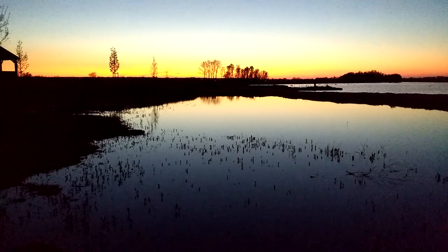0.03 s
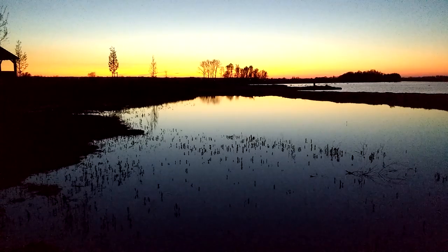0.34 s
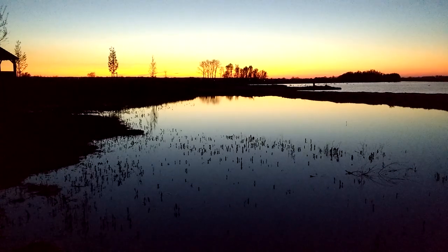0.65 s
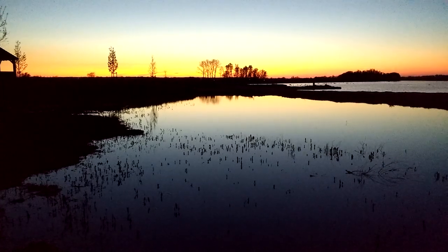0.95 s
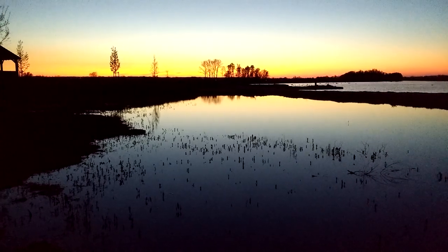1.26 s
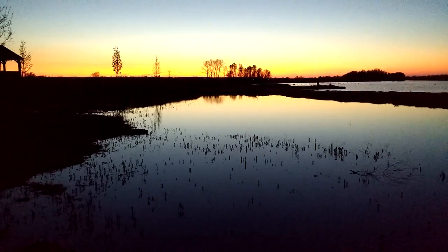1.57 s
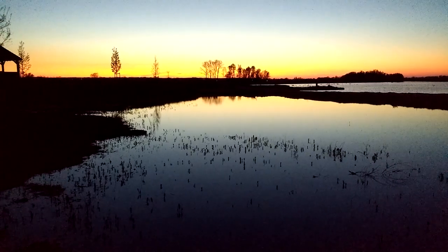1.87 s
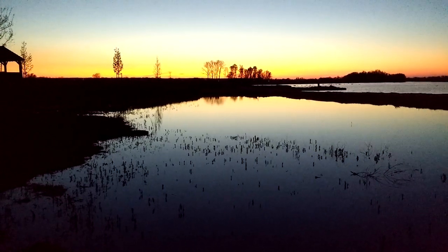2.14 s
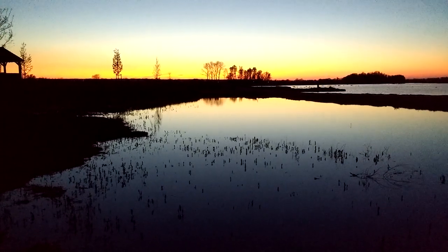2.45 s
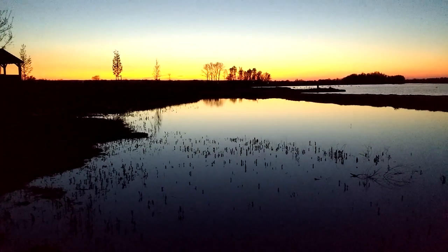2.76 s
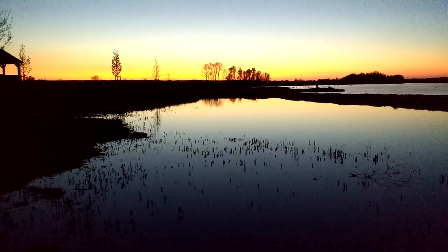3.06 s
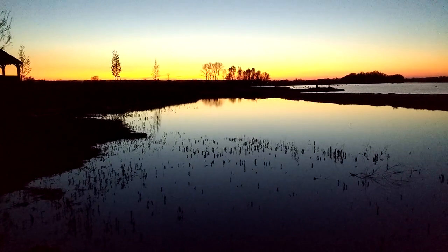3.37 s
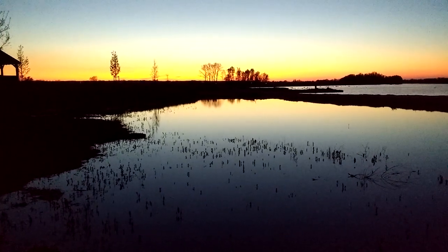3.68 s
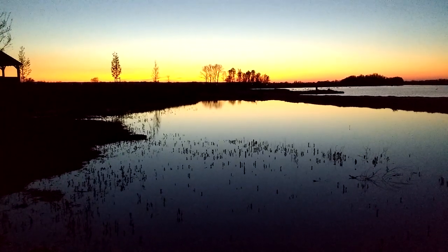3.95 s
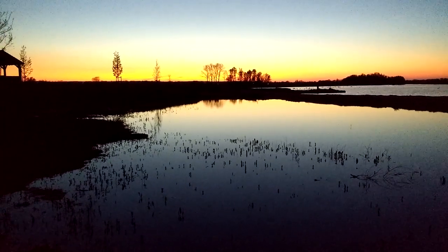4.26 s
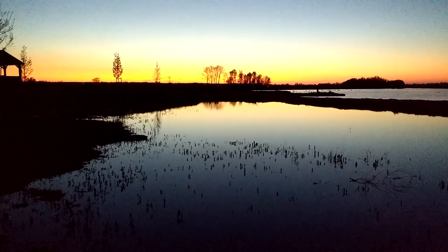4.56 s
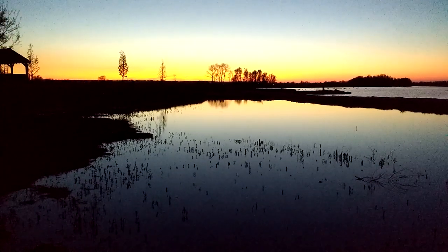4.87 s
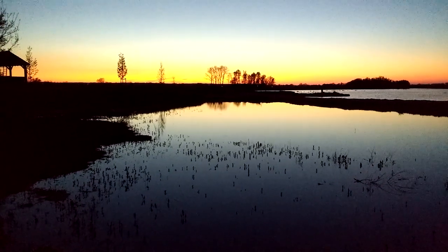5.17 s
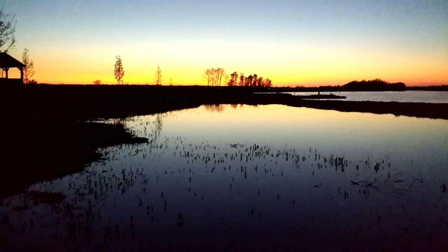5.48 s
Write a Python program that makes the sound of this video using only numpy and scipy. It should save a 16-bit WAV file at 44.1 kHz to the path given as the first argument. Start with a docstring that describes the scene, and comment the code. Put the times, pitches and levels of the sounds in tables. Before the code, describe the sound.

A dense chorus of toads trills at a pond while a distant goose honks five times over faint rumble and hiss.

```python
"""Dusk at a still pond fades in: a low rumble, microphone hiss and a chorus of toads all round.
Within the first second four close toads start up: a shrill, a deep, a mellow, then a bright one.
Each call is a trill, a run of short pulses that rasp briefly and ring the toad's vocal sac.
Two faint ticks come near 1.6 s, then a distant goose honks five times from 1.8 to 3.5 s.
The banks echo faintly, and the toads keep calling to the end."""
import sys
import numpy as np
from scipy import signal
from scipy.fft import rfft, irfft
from scipy.io import wavfile

SR = 44100
rng = np.random.default_rng(int(sys.argv[2]) if len(sys.argv) > 2 else 0)


def log_audio(samples):
    """Write samples as a 16-bit WAV file to the path given in sys.argv[1]."""
    # one column per channel
    frames = np.atleast_2d(samples).T
    # limit to full scale, then quantise
    limited = np.clip(frames, -1, 1)
    pcm = np.round(limited * 32767).astype(np.int16)
    wavfile.write(sys.argv[1], SR, pcm)


N = 247842
T = np.arange(N) / SR
FREQS = np.fft.rfftfreq(N, 1 / SR)
SIDES = np.array([[1], [-1]])  # adds to the left, takes from the right

# toad pulses that stand out of the trills: t/s, relative level/dB, f/Hz, left minus right/dB
LOUD_PULSES = [(0.2529, -18, 1626, -14), (0.6208, -18, 1547, -14), (0.6471, -16, 1600, -13),
               (0.6868, -13.5, 1575, -14), (0.7948, -17, 1570, -13), (1.263, -14, 1465, -9),
               (1.3291, -14.5, 1454, -11), (1.432, -20.5, 1515, -4), (1.7597, -12.5, 1545, -11),
               (1.803, -17, 1681, -11), (1.8352, -14.5, 1570, -13.5), (1.878, -14.5, 1530, -11.5),
               (1.924, -18.5, 1576, -20), (2.0476, -15.5, 1487, -11), (2.0669, -14.5, 1615, -10),
               (2.573, -12.5, 1562, -3.5), (2.6219, -18, 1546, -6.5), (2.7552, -14, 1590, -7.5),
               (2.8623, -16.0, 1605, -10), (2.9794, -16, 1624, -13.5), (3.006, -15.5, 1590, -13),
               (3.0364, -12, 1545, -11), (3.1015, -15.0, 1570, -9), (3.129, -16.5, 1490, -14),
               (3.579, -14.5, 1620, -11.5), (3.6978, -17, 1597, -16), (3.7138, -11.5, 1653, -4),
               (3.7387, -16.5, 1520, -9.5), (3.8081, -23.5, 1629, -10.5), (3.9985, -13, 1495, -9.5),
               (4.135, -12, 1546, -9.0), (4.1551, -12.5, 1560, -13), (4.3502, -17, 1560, -10),
               (4.5196, -12.5, 1645, -0.5), (4.5533, -13.5, 1586, -10.5), (4.8406, -14, 1586, -10.5),
               (4.8789, -14, 1526, -7), (4.9082, -15, 1460, -6), (4.9332, -14, 1575, -12),
               (4.9688, -14.5, 1490, -11.5), (5.016, -15, 1562, -9), (5.1603, -14.5, 1644, -6.0),
               (5.2367, -20.5, 1556, -6)]


def undb(db):
    """Turn decibels into a number to multiply by."""
    return 10 ** (np.asarray(db) / 20)


def level(x, db):
    """Scale a sound to an average (rms) level."""
    return x * undb(db) / np.sqrt(np.mean(x ** 2))


def curve(rows):
    """Join (time, value) rows by straight lines."""
    return np.interp(T, *np.transpose(rows))


def shape(points, hz):
    """Read between (frequency, value) points, giving every octave equal room."""
    f, value = np.transpose(points)
    return np.interp(np.log(hz + 1), np.log(f), value)


def noise(db):
    """Noise with a given gain at each frequency."""
    return irfft(rfft(rng.standard_normal(N)) * undb(db), N)


def wobble(per_s):
    """A random wobble, about 1 in size, that heads for a new value per_s times a second."""
    targets = rng.standard_normal(N // 8)
    return 1.3 * np.interp(T * per_s, np.arange(len(targets)), targets)


def rumble():
    """A low, distant rumble whose level wavers a little."""
    tone = [(20, -27), (50, -12), (80, -4.5), (97, 1), (114, -5), (145, -1), (175, -6), (199, 3),
            (225, -6.5), (310, -12), (600, -11), (900, -15), (1800, -11.5), (2400, -46)]  # the part both sides share: f/Hz, relative level/dB
    width = [(25, 10), (60, 1.5), (120, -3.5), (250, -3.5), (500, -6.5), (1000, -9)]  # the unshared part against the shared: f/Hz, level/dB
    shared_db = shape(tone, FREQS) - 60 * (FREQS > 2600)
    sound = noise(shared_db) + SIDES * noise(shared_db + shape(width, FREQS))
    return level(sound * undb(.5 * wobble(per_s=5.4)), -42.5)


def hiss():
    """Microphone hiss flickers; what both sides share dips every 2490 Hz, less so in the treble."""
    tone = [(500, -10.5), (2450, 2), (3100, 3.5), (4000, 5.5), (4800, 2), (6300, -2), (8500, -3),
            (11000, -8.5), (15000, -14)]  # colour of the hiss: f/Hz, relative level/dB
    width = [(1000, -3), (2200, 9), (2650, 9.5), (3200, -3), (4200, -8), (6000, -3.5), (12000, 1)]  # the unshared part against that colour: f/Hz, level/dB
    balance = [(4000, -1), (8000, -2), (12000, -4.5)]  # lean of the hiss: f/Hz, left minus right/dB
    tone_db = shape(tone, FREQS)
    dips_db = 10 * np.log10(.0053 + (FREQS / 13000) ** 4 + np.sin(np.pi * FREQS / 2490) ** 2)
    sound = noise(tone_db + dips_db) + SIDES * noise(tone_db + shape(width, FREQS))
    sound *= undb(1.2 * wobble(per_s=450))
    return level(irfft(rfft(sound) * undb(SIDES * shape(balance, FREQS) / 2), N), -52)


def ticks():
    """Each faint tick is a bright crack that dies within a millisecond or two."""
    cracks = [(1.5774, -48, -3), (1.6238, -45.5, -4)]  # ticks near the microphone: t/s, level/dB, left minus right/dB
    bright_noise = level(noise(shape([(2000, -30), (5000, 0), (9000, -3), (15000, -10)], FREQS)), 0)
    out = 0
    for start, db, pan_db in cracks:
        decay = (T >= start) * np.exp(-np.abs(T - start) / .0008)
        out = out + undb(db + SIDES * pan_db / 2) * bright_noise * decay
    return out


def bank_echo(x, fade_s, echo_db):
    """Reeds and banks scatter a faint echo, different at each side, that falls 60 dB in fade_s."""
    t = T[:SR // 2]
    tail = rng.standard_normal((2, len(t))) * undb(-60 * t / fade_s) * (1 - np.exp(-t / .01))
    tail *= undb(echo_db) / np.sqrt(np.sum(tail ** 2, axis=1, keepdims=True))
    return signal.fftconvolve(x.mean(axis=0)[None], tail, axes=1)[:, :N]


def goose():
    """Each honk rises and falls in pitch, hoarse at its edges; the throat boosts some overtones."""
    honks = [(1.82, .1, 309, -51, -2), (2.228, .11, 316, -43.5, 0), (2.648, .11, 320.5, -42.5, 0),
             (3.082, .12, 324.4, -42.5, 0), (3.505, .09, 343.5, -42.5, -6.5)]  # middle t/s, length/s, top f/Hz, level/dB, treble/dB
    throat = [(320, -4.5), (640, -10), (1000, 1), (1600, -4), (2200, -15), (2550, -5), (2880, 1.5),
              (3250, -6), (3520, 7), (3750, -5), (3950, -6), (4170, 0), (4600, -11), (6000, -30)]  # how the throat rings: f/Hz, gain/dB
    out, waver = np.zeros(N), wobble(per_s=400)
    harmonic = np.arange(1, 18)[:, None]
    for middle, length, top_hz, db, treble_db in honks:
        span = np.abs(T - middle) < length
        place = (T[span] - middle) / length  # runs from -1 to 1
        hoarse = (.005 + .025 * np.abs(place)) * waver[span]
        hz = top_hz * (1 - .26 * place ** 2 + hoarse)
        treble = np.clip(harmonic * hz / 1500 - 1, 0, 1)
        gain = undb(shape(throat, harmonic * hz) + treble_db * treble)
        tone = (gain * np.sin(harmonic * 2 * np.pi * np.cumsum(hz) / SR)).sum(axis=0)
        out[span] += level(tone, db) * np.exp(-np.abs(2 * place) ** 3)
    return out


def trill(start, end, rates, hz, climb, jitter_s, scatter_db):
    """Times, pitches and gains of one call's pulses: the pace drifts, the pitch climbs as the sac fills."""
    t = np.arange(0, max(end - start, .05), .001)
    count = np.cumsum(np.interp(t, [0, t[-1] / 2, t[-1]], rates)) * t[1]
    age = np.interp(np.arange(int(count[-1] - count[0]) + 1), count - count[0], t)
    late, size, tune = rng.standard_normal((256, 3))[:len(age)].T
    call_hz = hz * (1 + .004 * rng.standard_normal())  # no two calls have quite the same pitch
    pitch = call_hz * (1 - climb * np.exp(-age / .23) + .0085 * tune)
    return start + age + jitter_s * late, pitch, undb(scatter_db * size)


def toad_pulses(calls, hz, climb, jitter_s, scatter_db, give_way=.55):
    """Times, pitches and gains for all of one toad's calls; a pulse close to a loud pulse is softened."""
    loud_times = np.array(LOUD_PULSES)[:, 0]
    rows = []
    for start, end, *rates, db, swell_db in calls:
        times, pitch, gain = trill(start, end, rates, hz, climb, jitter_s, scatter_db)
        gain = gain * undb(db + swell_db * np.linspace(-.5, .5, len(times)))
        gap_s = np.abs(times[:, None] + .003 - loud_times).min(axis=1)
        gain *= 1 - give_way * np.exp(-(gap_s / .0067) ** 2)
        rows.append([times, pitch, gain])
    return np.hstack(rows)


def vocal_sac(times, hz, gain, pan_db, lead_rad, attack_s, ring_s, sag, octave_db, rasp_rad=.86):
    """Each pulse starts sharply, rings the toad's throat pouch with a rasp, sags in pitch and dies."""
    t = np.arange(1024) / SR
    body = (1 - np.exp(-(t / attack_s) ** 2)) * np.exp(-(t / ring_s) ** 2)
    body /= body.max()
    glide = 1 + sag * (np.exp(-t / ring_s * 2) - .5)
    phase = 2 * np.pi * (np.outer(hz, np.cumsum(glide)) / SR + rng.random(512)[:len(hz), None])
    samples = (np.abs(times)[:, None] * SR).astype(int) + np.arange(len(t))
    # the rasp is a ragged tone an octave up, heard only while the pulse is strong
    octave = body ** 2 * np.exp(-(t / .0091) ** 2)
    octave = undb(octave_db) * octave / octave.max()
    ragged = rasp_rad * wobble(per_s=1300)[samples % N]
    out = []
    for side in (.5, -.5):  # the left is pan_db louder than the right and lead_rad ahead
        angle = phase + side * lead_rad
        wave = body * np.sin(angle) + octave * np.sin(2 * angle + ragged)
        wave *= (gain * undb(side * pan_db))[:, None]
        out.append(np.bincount(samples.ravel(), wave.ravel(), N)[:N])  # add each pulse at its time
    return np.array(out)


def crowd(hz, spread, pan_db, width, ring_s, octave_db, count):
    """Toads of different sizes repeat their calls, each at its own pace and from its own side."""
    out = 0
    for offset in np.linspace(-1, 1, count):
        pace, early, side = rng.random(3)
        starts = (np.arange(7) - early) * (.9 + .15 * pace)
        rate = 36 + 16 * pace  # pulses per second
        calls = [(start, start + .88, rate * 1.15, rate, rate, 0, 0) for start in starts]
        own_hz = hz * (1 + spread * offset)
        times, pitch, gain = toad_pulses(calls, own_hz, climb=.022, jitter_s=.0007, scatter_db=1.7)
        out = out + vocal_sac(times, pitch, gain * (times > 0), pan_db + 4 * (side - .5),
                              lead_rad=.16 + width * (side - .5), attack_s=.0016, ring_s=ring_s,
                              sag=.015, octave_db=octave_db)
    return out


def chorus():
    """Two toads at middle distance swell and ebb over many far ones, large and small."""
    swell = [(.1, -39.5), (0.2, -30.5), (0.36, -31.5), (0.5, -29.5), (0.9, -29), (1.13, -30.5), (1.45, -38),
             (1.85, -28.5), (2.23, -30), (2.48, -35.5), (2.75, -28.5), (3.2, -28.5), (3.3, -38.5),
             (3.5, -29.5), (3.9, -29.5), (4.3, -32), (4.7, -29.5), (4.94, -26.5), (5.1, -31), (5.6, -30.5)]  # loudness of the middle toads: t/s, level/dB
    middle = crowd(hz=1564.6, spread=.025, pan_db=-9, width=2.26, ring_s=.0057, octave_db=-24, count=2)
    far = crowd(hz=1554, spread=.16, pan_db=1.5, width=.5, ring_s=.0047, octave_db=-19.5, count=7)
    far_deep = crowd(hz=1292, spread=.053, pan_db=-3, width=.3, ring_s=.0033, octave_db=-33.5, count=3)
    swell_db = curve(swell)
    far *= undb(.5 * swell_db)  # the far toads join in, by half as much
    return level(middle, -.022) * undb(swell_db) + level(far, -39.5) + level(far_deep, -43.5)


def near_toads():
    """Four close toads trill, each with its own pitch and ring, and single loud pulses stand out."""
    # one trill a row: start t/s, end t/s, pulse rate/Hz at the start, middle and end,
    # relative level/dB, swell from start to end/dB
    deep_calls = [(0.1379, 0.48, 46.5, 55.5, 41.8, -23, -1.5),
                  (0.8964, 1.42, 42.68, 34.56, 55.97, -22, 0.7),
                  (1.7234, 2.33, 56.6, 37.8, 30.66, -22.5, 0.5),
                  (2.6643, 3.24, 29.52, 48.26, 41.4, -22, -1.5),
                  (3.6498, 4.21, 36.67, 47.53, 52.7, -23.9, -0.5),
                  (4.5332, 5.07, 58, 43.53, 47.34, -22.5, -1.5),
                  (5.4557, 5.61, 44, 49.16, 41.45, -21.5, 3.5)]
    mellow_calls = [(0.39, 1.1, 44.58, 52.23, 54.93, -19, -3.5),
                    (1.4051, 2.1, 42.68, 53.06, 44.69, -18, 1.5),
                    (2.2906, 3.05, 43.52, 42.18, 39.32, -19.6, -1),
                    (3.2576, 4.05, 43.01, 52.3, 53.8, -18.5, 0), (4.197, 5.05, 47.95, 40.65, 49.1, -18, 4),
                    (5.1201, 5.61, 53.2, 47.3, 39.95, -22, -5.5)]
    bright_calls = [(0.6164, 1.4, 32.25, 41.5, 35.32, -22.5, 4.1),
                    (1.5696, 2.28, 37.36, 37.02, 28.95, -22, 2.52),
                    (2.5655, 3.25, 35.87, 32.23, 37.32, -21.0, 1.53),
                    (3.4808, 4.2, 34.9, 34.88, 53.7, -23.5, 4.5),
                    (4.3509, 5.07, 45.77, 30.99, 37.74, -22, 0.66),
                    (5.1525, 5.61, 34.33, 37.62, 28.96, -21.5, 0.41)]
    shrill_calls = [(0.0801,0.37,49.8,34.2,34.66,-20,1.6), (0.6678,1.39,58.35,44.77,45.61,-23,4.4),
                    (1.7412,2.46,35.75,31.2,42.48,-22.5,1.2), (2.6168,3.25,32.04,39.11,39.93,-21,4.1),
                    (3.4702,4.22,38.63,31.94,46.76,-21.8,1.6), (4.2422,4.68,27.19,35.53,41.24,-23.5,0.63),
                    (4.7293,5.61,48.65,30.73,32.3,-23,0.6)]
    deep = toad_pulses(deep_calls, hz=1418, climb=.078, jitter_s=.00028, scatter_db=.7)
    mellow = toad_pulses(mellow_calls, hz=1587, climb=.057, jitter_s=.0006, scatter_db=1, give_way=.73)
    bright = toad_pulses(bright_calls, hz=1640, climb=.04, jitter_s=.0003, scatter_db=1.5, give_way=.62)
    shrill = toad_pulses(shrill_calls, hz=1790, climb=.028, jitter_s=.0003, scatter_db=1.85,
                         give_way=.45)
    out = undb(.96) * vocal_sac(*deep, pan_db=-5, lead_rad=.55, attack_s=.002, ring_s=.0059,
                                sag=.0067, octave_db=-23.5, rasp_rad=1)
    out += undb(-2.5) * vocal_sac(*mellow, pan_db=-9, lead_rad=.25, attack_s=.0017, ring_s=.0084,
                                  sag=.011, octave_db=-28.5, rasp_rad=.44)
    out += undb(.6) * vocal_sac(*bright, pan_db=-8.5, lead_rad=.2, attack_s=.0015, ring_s=.0065,
                                sag=.015, octave_db=-23.5, rasp_rad=.66)
    out += undb(2.4) * vocal_sac(*shrill, pan_db=-1.5, lead_rad=2.33, attack_s=.0013, ring_s=.0088,
                                 sag=.01, octave_db=-19.5, rasp_rad=.9)
    times, db, hz, pan_db = np.transpose(LOUD_PULSES)
    return out + vocal_sac(times, hz, undb(db - 1), pan_db, lead_rad=.51, attack_s=.0017, ring_s=.0061,
                           sag=.068, octave_db=-29)


def scene():
    """Toads and goose reach two microphones over the background; what both share of them is hollowed."""
    hollows = [(2000, 2.5), (2250, 4), (2490, -26.5), (2750, -8), (2950, -0.5), (3900, 0), (4400, -6),
               (4950, -25.5)]  # dips in the shared sound: f/Hz, gain/dB
    honks = goose()
    honks = honks + bank_echo(honks[None], fade_s=.3, echo_db=-11)
    calls = near_toads() + chorus() + honks
    calls += bank_echo(calls, fade_s=.35, echo_db=-22)
    calls *= signal.windows.tukey(N, .001)  # soften both ends
    shared = calls.mean(axis=0)
    hollowed = irfft(rfft(shared) * undb(shape(hollows, FREQS)), N)
    return calls - shared + hollowed + ticks() + rumble() + hiss()


def record(dry):
    """The recorder fades in and cuts the treble above 15550 Hz."""
    fade_in = [(.07, -100), (.082, -19.5), (.13, -17), (.18, -9), (.25, -7), (.33, -3.5)]  # the opening rise: t/s, gain/dB
    treble_cut = signal.ellip(10, .2, 80, 15550, fs=SR, output="sos")
    return signal.sosfilt(treble_cut, dry * undb(curve(fade_in)))


dry = scene()
out = record(dry)
log_audio(out)
```